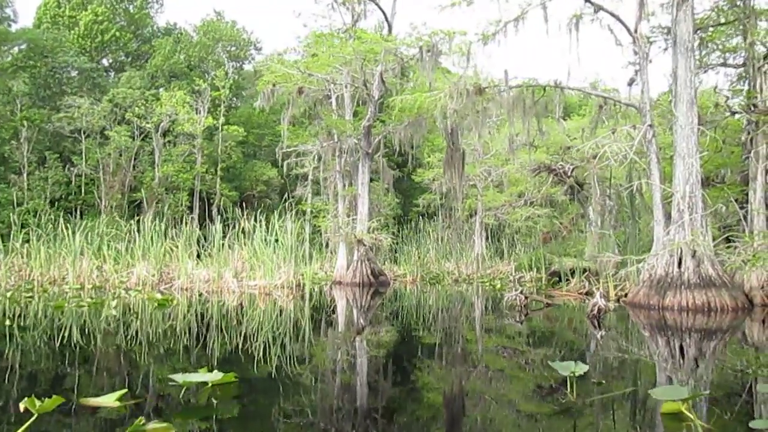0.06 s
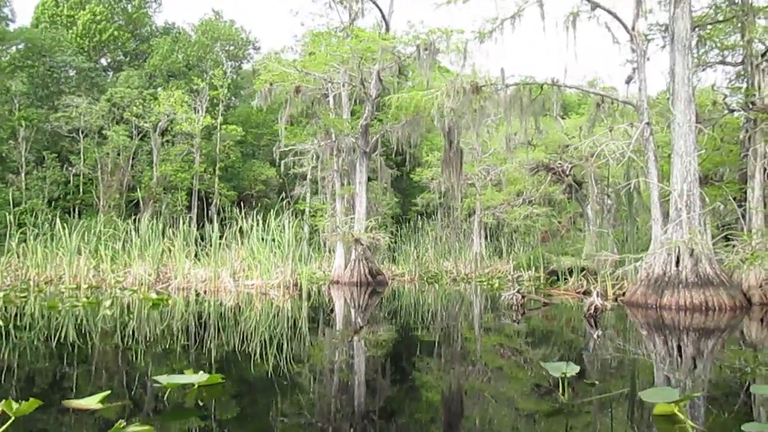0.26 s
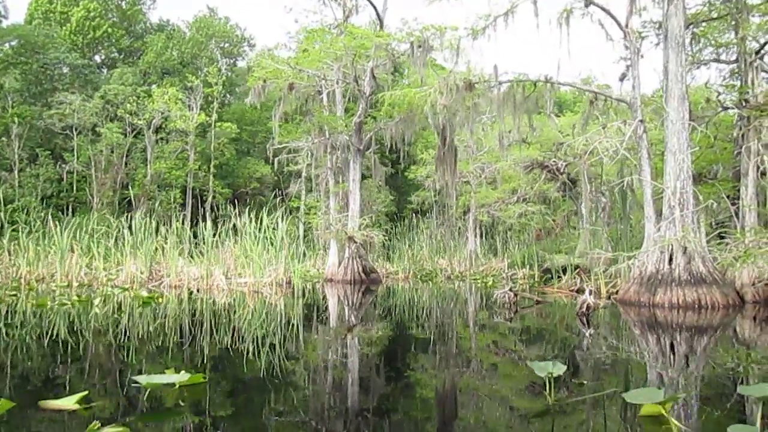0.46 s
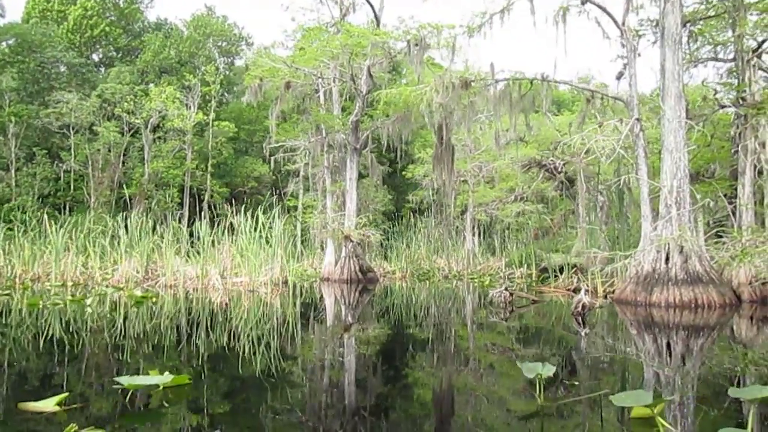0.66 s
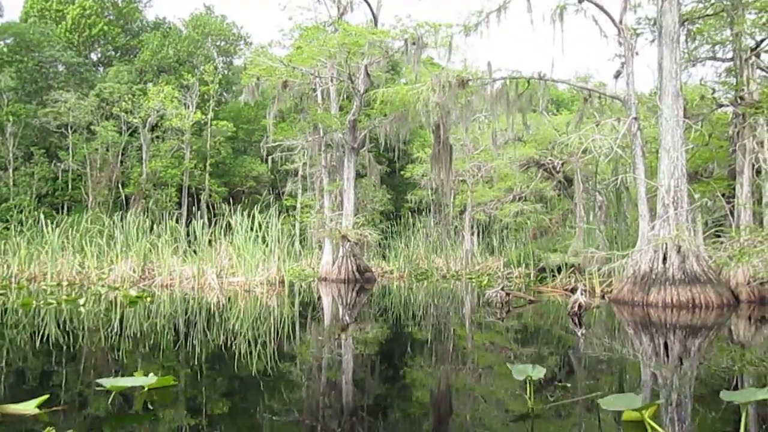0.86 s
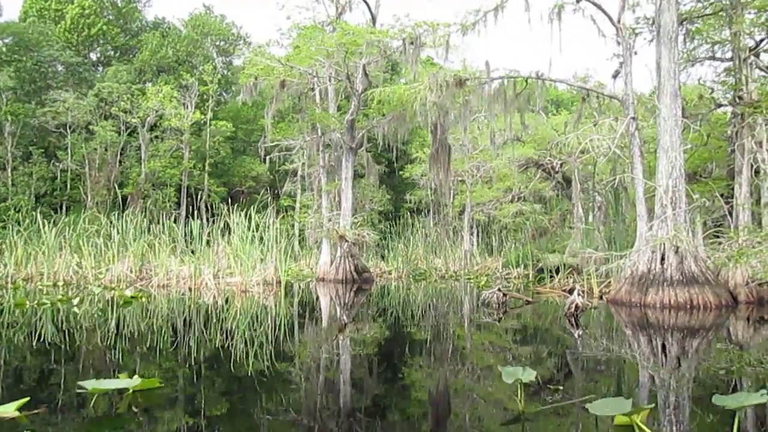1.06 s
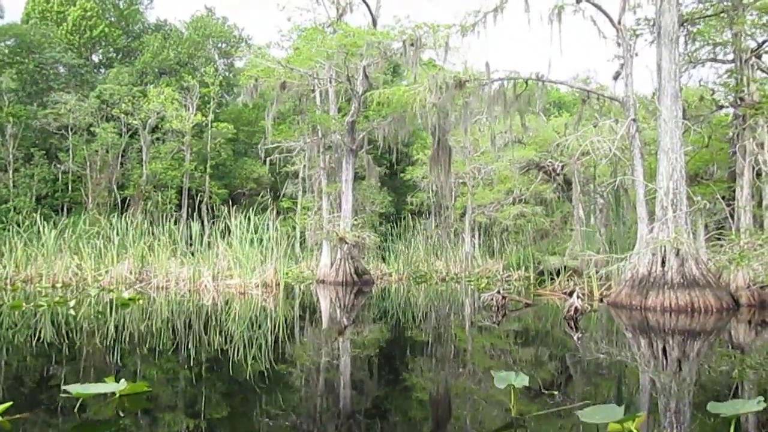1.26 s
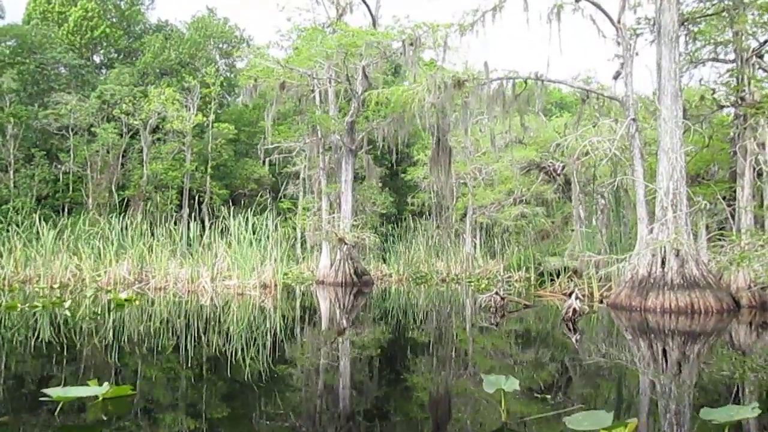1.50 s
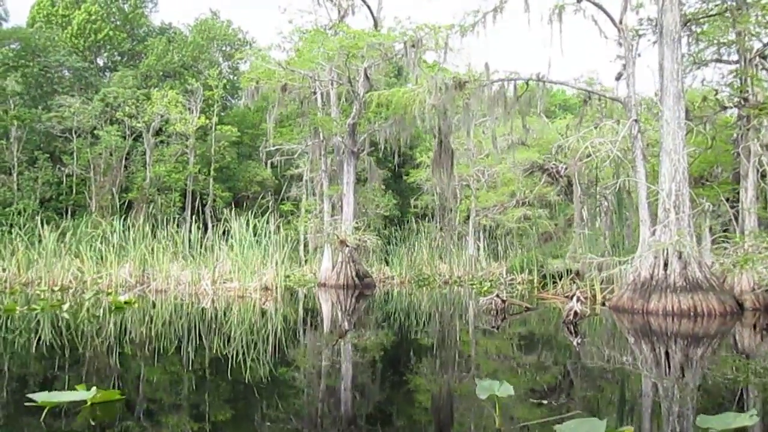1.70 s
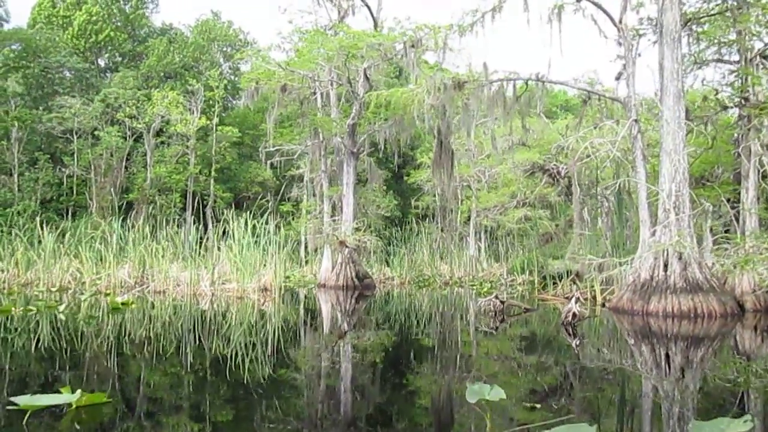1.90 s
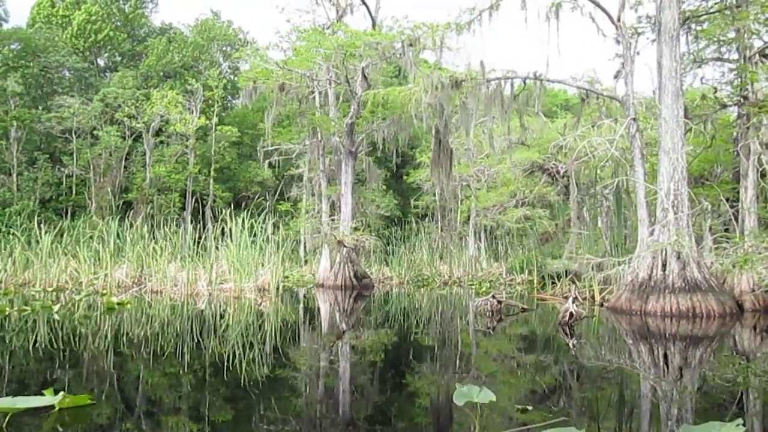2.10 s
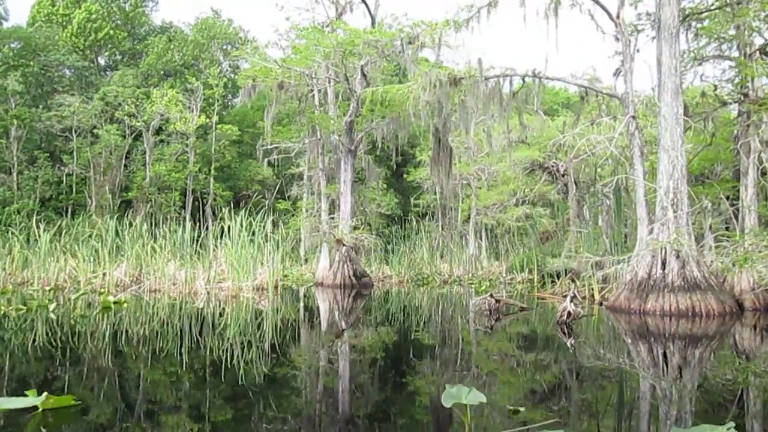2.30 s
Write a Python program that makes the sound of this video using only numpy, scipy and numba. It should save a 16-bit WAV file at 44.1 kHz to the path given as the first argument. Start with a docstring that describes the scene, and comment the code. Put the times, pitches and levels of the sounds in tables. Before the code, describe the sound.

A wading bird wails twice, shrill and raspy, echoing over a still swamp.

```python
"""On a still swamp lake, a limpkin (a wading bird) wails twice.
Each call opens with a rattle: pulses that ring the bird's throat and speed up. It breaks into a
shrill whistle that rises and falls, and ends in a short croak of slowing pulses. The trees on the
bank echo it, and the echo of an earlier call is still fading at the start. Behind it are two soft
knocks, faint ticks and chirps, and the low rumble and hiss of the open air."""
import sys
import numpy as np
from scipy import signal
from scipy.fft import rfft, irfft
from scipy.io import wavfile
from scipy.ndimage import uniform_filter1d
from numba import njit

SR = 44100
rng = np.random.default_rng(int(sys.argv[2]) if len(sys.argv) > 2 else 0)


def wrap_up_sound(samples):
    """Save the sound to the file named by the first command line argument, as 16-bit audio."""
    columns = np.atleast_2d(samples).T
    # keep every value between -1 and 1, then stretch to whole-number steps
    tamed = np.clip(columns, -1, 1)
    steps = np.round(tamed * 32767).astype(np.int16)
    wavfile.write(sys.argv[1], SR, steps)


N = 108045

# The whistle of each call. Each row: time in seconds, pitch in Hz, then levels in dB for
# harmonics 1, 2 and 3 and for all the higher ones together.
LONG_WHISTLE = [(0.325, 1514, -25.5, -39.9, -38, -50), (0.365, 1614, -37.5, -31, -41.5, -45.2),
                (0.4, 1645, -22.5, -41, -37.5, -41), (0.43, 1665, -53, -34.5, -38.9, -34.5),
                (0.465, 1666, -36, -30.7, -46, -36.5), (0.52, 1649, -42, -35, -36.5, -40.5),
                (0.565, 1648, -26, -36.5, -36, -41), (0.6, 1604, -30, -33, -48, -43),
                (0.62, 1561, -25.5, -31.6, -37, -46), (0.665, 1513, -22.5, -33.5, -30, -46),
                (0.71, 1479, -26.5, -40, -32.5, -37), (0.752, 1432, -22, -38.5, -37.5, -39.5),
                (0.768, 1379, -21.5, -37, -44, -39), (0.795, 1353, -22.5, -43, -63, -48.5),
                (0.825, 1332, -33, -39.5, -49, -45.5), (0.87, 1299, -21, -37, -43, -44.5),
                (0.903, 1268, -30.5, -41.5, -43, -48), (0.918, 1210, -26, -41.3, -42.5, -32.5)]
SHORT_WHISTLE = [(1.84, 1519, -29.9, -34.5, -57, -44), (1.87, 1604, -29, -36, -42, -41.5),
                 (1.895, 1624, -38, -35.5, -43, -40.5), (1.925, 1633, -28.5, -40.5, -54, -43),
                 (1.95, 1631, -23.5, -38, -36, -38), (1.972, 1596, -35, -40.5, -50, -46.5),
                 (1.995, 1536, -27.5, -30, -39, -48), (2.02, 1463, -28, -38, -32.5, -47.5),
                 (2.05, 1374, -23, -42, -41, -37.5), (2.07, 1291, -23, -44.3, -44, -49),
                 (2.095, 1226, -24.5, -42, -47, -46), (2.113, 1096, -28.5, -57, -57, -45.5)]
# How the throat shapes the higher harmonics. Each row: frequency in Hz, relative level in dB.
OVERTONE_COLOUR = [(4400, 1), (5000, 5.5), (5450, -7), (6100, 2), (6900, 6), (7350, -0.5), (7750, 3.5),
                   (8400, 1), (8800, 2.5), (9300, 3), (10100, -4), (10800, 0), (11700, -2.5),
                   (13200, -11.5), (15000, -10), (16000, -21)]
# The rattle before and the croak after each whistle. Each row: time in seconds, pulses per second,
# throat resonance in Hz, relative level of the throat in dB, level of the rasp in dB.
LONG_RATTLE = [(.226, 134, 1046, -32.5, -51), (.245, 165, 1355, -28, -44.5), (.27, 187, 1365, -27, -34.5),
               (.305, 184, 1420, -34.5, -31), (.33, 180, 1436, -30, -33), (.36, 220, 1580, -73, -50)]
LONG_CROAK = [(.918, 182, 1177, -22.5, -49), (0.938, 175.2, 1340, -38, -36),
              (0.963, 169.7, 1227, -22.5, -47), (.978, 160, 1114, -37, -43.5)]
SHORT_RATTLE = [(1.727, 115.8, 1100, -32, -57), (1.749, 164.3, 1270, -26, -44.5),
                (1.785, 178, 1400, -28.5, -34.5), (1.833, 189.8, 1400, -28, -33),
                (1.855, 194, 1570, -32.5, -35.5), (1.883, 219.7, 1490, -36.5, -58)]
SHORT_CROAK = [(2.112, 170, 1060, -27.5, -42), (2.135, 161.4, 1346, -29, -44.5),
               (2.161, 155.4, 1190, -25.5, -46), (2.183, 147.7, 1000, -36, -50)]
# How the throat shapes the rasp. Each row: frequency in Hz, relative level in dB.
RASP_COLOUR = [(550, -26), (750, -5.5), (1000, -1), (1900, -2.5), (2300, -8.5), (2650, -2.5), (3000, -2.5),
               (3500, -0.5), (4150, 3), (4550, -2.5), (5200, -8), (6300, -3.5), (6900, -1.5), (7600, -15),
               (9300, -7.5), (11500, -18.5), (13500, -22), (16000, -36)]
# The throat's high resonances. Each row: frequency in Hz, width in Hz, level in dB next to the rasp.
HIGH_RESONANCES = [(3486, 770, -8), (4550, 520, -9.5), (6846, 630, -12.5)]
# The trees' echo. Each row: frequency in Hz, seconds to fade by 60 dB, relative level in dB.
TREE_BANDS = [(693, 0.57, -11.5), (1400, 1.335, -9), (2900, 1.11, -1.5), (4100, 1.1, -8.5), (6500, 1, -9.5),
              (9500, .8, -10), (13500, .5, -28)]
# The echo of an earlier call. Each row: frequency in Hz, width in Hz, starting level in dB.
EARLIER_ECHO_BANDS = [(1400, 410, -52), (2920, 900, -65.5)]
# Soft knocks and high ticks. Each row: start in seconds, relative level in dB.
KNOCK_HITS = [(1.2295, -6), (1.447, -2.5)]
TICK_HITS = [(1.465, -47), (1.525, -46), (1.535, -41.5), (1.576, -48)]
# The dull tone of a knock. Each row: frequency in Hz, gain in dB.
KNOCK_TONE = [(100, -15), (230, -1), (400, 3), (750, -3), (1200, -4.5), (1500, -13), (1900, -18),
              (4000, -33), (9000, -55)]
# Distant chirps. Each row: loudest moment in seconds, frequency in Hz, level in dB.
FAR_CHIRPS = [(1.3, 2039, -57), (1.543, 2014, -55)]
# The rumble and hiss of the air. Each row: frequency in Hz, relative level in dB.
AIR_COLOUR = [(20, -21.5), (35, -4.5), (55, 0), (85, -1.5), (130, -2.5), (200, -9), (300, -16), (500, -22),
              (800, -23.5), (1400, -26.5), (2100, -37), (3200, -33.5), (4500, -39), (10000, -45),
              (15500, -54)]
# Narrow dips in the microphone's response. Each row: frequency in Hz, width in Hz.
MIC_DIPS = [(3935, 297), (7860, 110)]


def whistle(table):
    """A stack of harmonics, hoarse at first; the high ones slide through the throat's resonances."""
    hz, first_db, second_db, third_db, upper_db = curves(table)
    age = np.maximum(np.arange(N) / SR - table[0][0], 0)
    hoarseness = 0.035 * np.exp(-age / 0.04) * drift(597)  # a rough pitch that soon settles
    phase = 2 * np.pi * np.cumsum(hz * (1 + 0.0028 * drift(255) + hoarseness)) / SR
    slope_db = -1.4 + 6 * np.log2(hz / 1700)  # the tone dulls as the pitch sinks
    upper = np.array([gain_at(k * hz, OVERTONE_COLOUR) * undb(k * slope_db) * (k * hz < 15700)
                      for k in range(4, 14)])
    upper = upper / np.sqrt((upper ** 2).sum(0)) * undb(upper_db)
    gains = [undb(first_db), undb(second_db), undb(third_db), *upper]
    flutter_db = 2
    tone = sum(gain * undb(flutter_db * drift(99)) * np.sin(k * phase)
               for k, gain in enumerate(gains, 1))
    return np.sqrt(2) * tone * fade(table)


def rattle(table):
    """Uneven pulses ring the throat; each carries a puff of bright rasp, over a faint low thrum."""
    rate, throat_hz, throat_db, rasp_db = curves(table)
    t = np.arange(N) / SR
    sounding = (t >= table[0][0]) & (t <= table[-1][0])

    def levelled(x):
        """Scale to an average (rms) level of 1 while the rattle sounds."""
        return x / np.sqrt(np.mean(x[sounding] ** 2))

    cycles = np.cumsum(sounding * rate * np.exp(0.06 * drift(200))) / SR
    pulses = np.diff(np.ceil(cycles), prepend=0)  # one click as each cycle begins
    pulses = pulses * undb(0.5 * drift(240)) / np.sqrt(rate)
    puffs = sounding * np.exp(-(cycles % 1) / 0.76) * rng.standard_normal(N)
    low_cut = signal.butter(6, 830, "high", fs=SR, output="sos")
    throat = levelled(signal.sosfilt(low_cut, band(pulses, throat_hz, width_hz=288)))
    noise_share = 0.75
    buzz = np.sqrt(1 - noise_share) * levelled(pulses) + np.sqrt(noise_share) * levelled(puffs)
    rasp = levelled(colour(buzz, RASP_COLOUR))
    rasp += sum(undb(db) * levelled(band(puffs, hz, width)) for hz, width, db in HIGH_RESONANCES)
    thrum = np.sin(2 * np.pi * cycles) * fade(table) * undb(-11.5)  # a tone at the pulse rate
    return throat * undb(throat_db - 2) + (rasp + thrum) * undb(rasp_db)


def tree_echo(call):
    """Near trunks scatter the call quickly, then the wood rings on; the middle pitches last longest."""
    t, hz = np.arange(N) / SR, np.fft.rfftfreq(N, 1 / SR)
    noise_spectrum = rfft(rng.standard_normal(N))
    log_centres = np.log([row[0] for row in TREE_BANDS])
    arrived = t > 0.0042
    echo = unit(rng.standard_normal(N) * arrived * np.exp(-t / 0.042)) * undb(-5.5)  # near trunks
    for share, (_, fade_s, db) in zip(np.eye(len(TREE_BANDS)), TREE_BANDS):
        noise_band = irfft(noise_spectrum * np.interp(np.log(hz + 1), log_centres, share), N)
        echo += noise_band * unit(arrived * undb(-60 * t / fade_s)) * undb(db)
    return signal.fftconvolve(call, echo / np.sqrt(N))[:N]


def earlier_echo():
    """The last of an earlier call fades in the trees, as two bands of noise."""
    t = np.arange(N) / SR
    ring = sum(unit(band(rng.standard_normal(N), hz, width)) * undb(db)
               for hz, width, db in EARLIER_ECHO_BANDS)
    return ring * undb(-60 * t / 0.89)


def knocks():
    """Each soft knock is one blow and a short rattle of noise, both dulled."""
    blows = sum(undb(db) * (np.arange(N) == int(start * SR)) for start, db in KNOCK_HITS)
    tails = undb(-23) * bursts(KNOCK_HITS, decay_s=0.0084)
    return colour(blows + tails, KNOCK_TONE)


def ticks():
    """Tiny bursts of high noise make faint ticks."""
    return band(bursts(TICK_HITS, decay_s=0.0014), hz=9800, width_hz=5500)


def chirps():
    """Each distant chirp is a narrow band of noise that swells and fades quickly."""
    t = np.arange(N) / SR
    sound = np.zeros(N)
    for peak_s, hz, db in FAR_CHIRPS:
        swell = np.exp(-((t - peak_s) / 0.018) ** 2)
        sound += unit(band(rng.standard_normal(N), hz, width_hz=530)) * undb(db) * swell
    return sound


def open_air():
    """The open air rumbles and faintly hisses; its level wanders a little."""
    gains = gain_at(np.fft.rfftfreq(N, 1 / SR), AIR_COLOUR)
    air = irfft(rfft(rng.standard_normal(N)) * gains, N)
    return unit(air) * undb(-44 + 0.49 * drift(1.7))


def undb(db):
    """Turn decibels into a number to multiply by."""
    return 10 ** (np.asarray(db) / 20)


def unit(x):
    """Scale to an average (rms) level of 1."""
    return x / np.sqrt(np.mean(x ** 2) + 1e-18)


def curves(table):
    """Join a table's rows with straight lines over time, one curve for each later column."""
    rows = np.array(table, float)
    return [np.interp(np.arange(N) / SR, rows[:, 0], column) for column in rows.T[1:]]


def fade(table, in_s=0.029, out_s=0.0056):
    """Fade in just before a table's first row and out just after its last."""
    t = np.arange(N) / SR
    rise = np.clip((t - table[0][0]) / in_s + 1, 0, 1)
    fall = np.clip((table[-1][0] - t) / out_s + 1, 0, 1)
    return rise * fall


def drift(rate_hz):
    """A smooth random wobble, about 1 in size; a higher rate wobbles faster."""
    span = max(int(SR / rate_hz), 1)
    return unit(uniform_filter1d(uniform_filter1d(rng.standard_normal(N), span), span))


def bursts(table, decay_s):
    """Noise that starts at each row's time and dies away."""
    t = np.arange(N) / SR
    loudness = sum(undb(db) * (t >= start) * np.exp(-abs(t - start) / decay_s) for start, db in table)
    return rng.standard_normal(N) * loudness


def gain_at(hz, points):
    """Look up the gain at any frequency in a table of Hz and dB."""
    table_hz, table_db = np.array(points, float).T
    return undb(np.interp(np.log(np.maximum(hz, 1)), np.log(table_hz), table_db))


def colour(x, points):
    """Filter a sound by a table of Hz and dB."""
    size = 8192
    cepstrum = irfft(np.log(gain_at(np.fft.rfftfreq(size, 1 / SR), points)))
    cepstrum[1:size // 2] *= 2  # folding it makes the filter ring after a sound, never before
    cepstrum[size // 2 + 1:] = 0
    return signal.fftconvolve(x, irfft(np.exp(rfft(cepstrum))))[:N]


@njit
def resonate(x, hz, width_hz):
    """Let through the sound near a frequency that can move."""
    y, band_state, low_state = np.empty(len(x)), 0., 0.
    for i in range(len(x)):
        tuning, damping = np.tan(np.pi * hz[i] / SR), width_hz / hz[i]
        ring = (band_state + tuning * (x[i] - low_state)) / (1 + tuning * (tuning + damping))
        band_state = 2 * ring - band_state
        low_state += 2 * tuning * ring
        y[i] = damping * ring
    return y


def band(x, hz, width_hz):
    """Resonate twice for a band with steeper sides."""
    hz, width_hz = hz * np.ones(N), float(width_hz)
    return resonate(resonate(x + 1e-18, hz, width_hz), hz, width_hz)


def scene():
    """Add up the bird, its echo and the lake around it, in one channel."""
    bird = whistle(LONG_WHISTLE) + whistle(SHORT_WHISTLE)
    bird += sum(rattle(table) for table in (LONG_RATTLE, LONG_CROAK, SHORT_RATTLE, SHORT_CROAK))
    return (bird + tree_echo(bird) + earlier_echo() + knocks() + ticks() + chirps() + open_air())[None]


def record(dry):
    """The microphone has two narrow dips, and the treble above 15700 Hz is cut."""
    for hz, width in MIC_DIPS:
        dry = signal.lfilter(*signal.iirnotch(hz, hz / width, fs=SR), dry)
    return signal.sosfilt(signal.ellip(8, .2, 70, 15700, fs=SR, output="sos"), dry)


dry = scene()
out = record(dry)
wrap_up_sound(out)
```